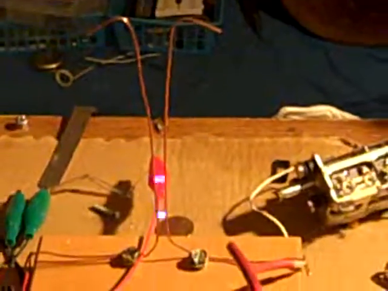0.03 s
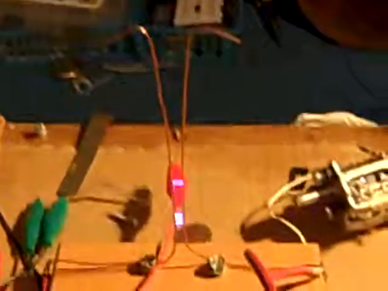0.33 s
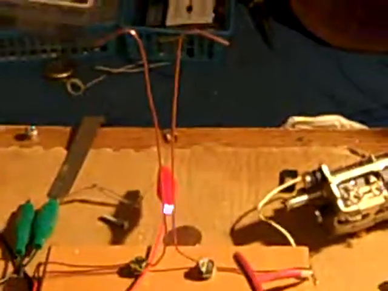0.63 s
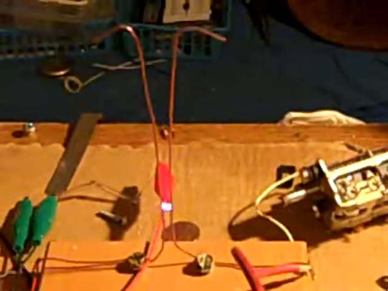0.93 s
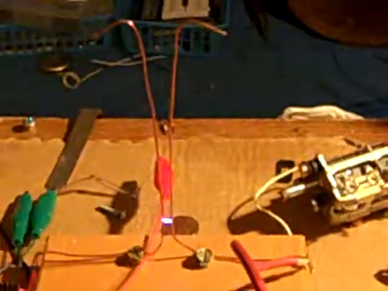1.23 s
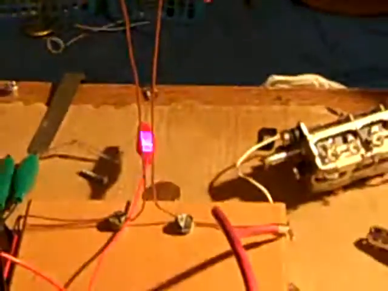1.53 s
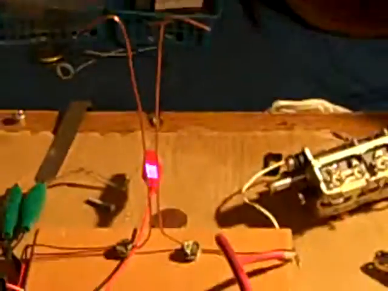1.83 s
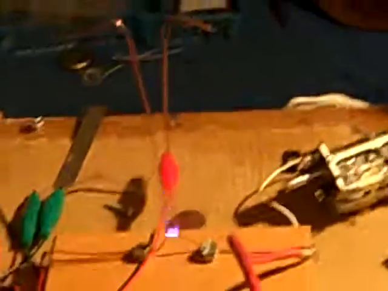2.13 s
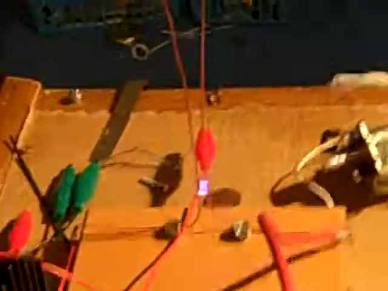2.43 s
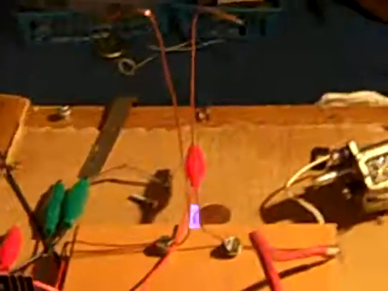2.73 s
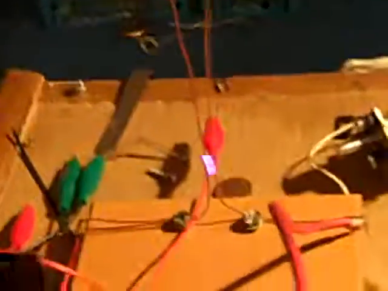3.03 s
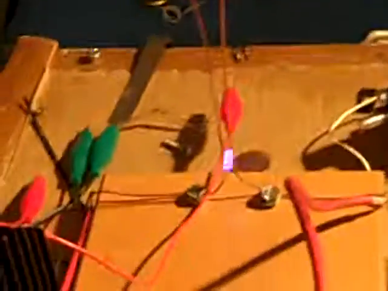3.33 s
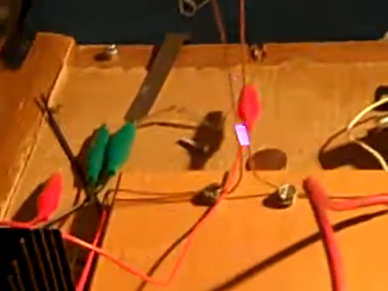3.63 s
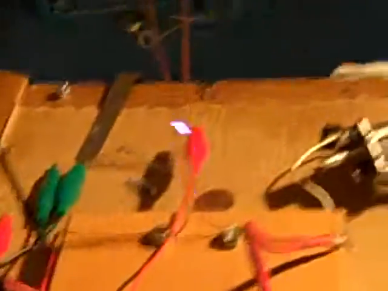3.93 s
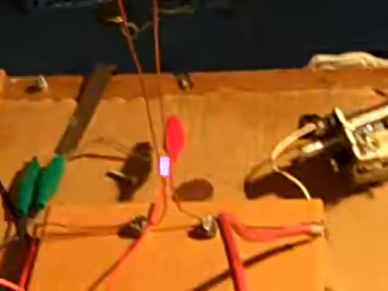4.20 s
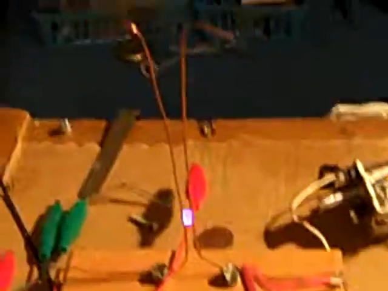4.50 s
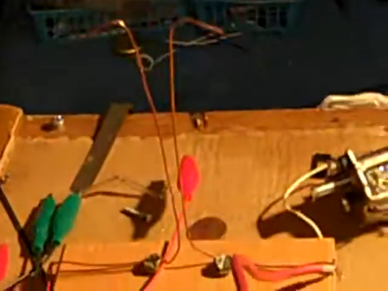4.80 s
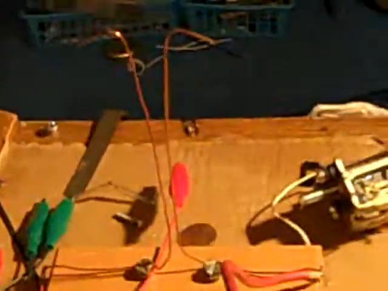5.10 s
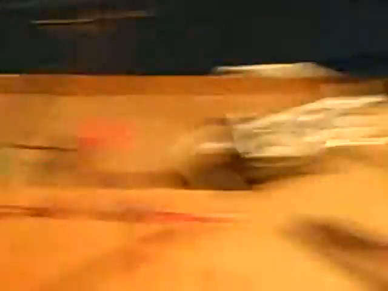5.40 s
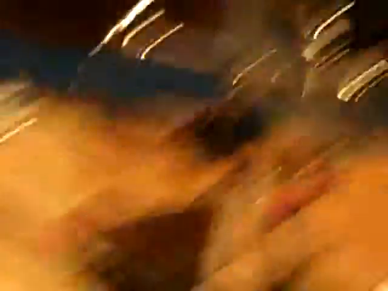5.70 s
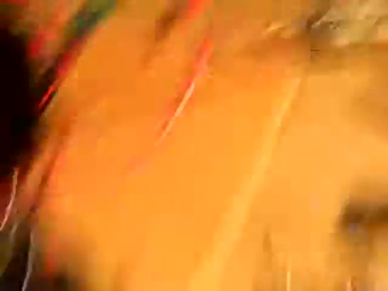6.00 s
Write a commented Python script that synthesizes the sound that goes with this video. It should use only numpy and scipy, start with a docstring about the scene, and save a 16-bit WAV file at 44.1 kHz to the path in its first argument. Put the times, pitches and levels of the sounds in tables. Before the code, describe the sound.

A small high-voltage arc between two wires sizzles with a thin, high buzz, chirping irregularly as it stretches, drops in pitch and snaps back. After about five seconds a switch clacks and the arc stops dead. Faint room air, low hum and a thin whine remain. Fingers tick and rub on the nearby hand-held microphone, and a button clicks at the end.

```python
"""A sizzling, chirping buzz: thousands of sparks a second cross a small high-voltage gap in a room.
The gap, two wires on a wooden board, is a relaxation oscillator: it charges until the air breaks down,
so a stretching arc sparks slower and louder, then restrikes short. A switch clacks and cuts the power,
a few last sparks drain the charge, and room air, hum and a thin whine remain, with finger noise and a
button click on the nearby hand-held camera whose two microphone ports hear the scene."""
import sys
import numpy as np
from scipy import signal
from scipy.fft import rfft, irfft
from scipy.io import wavfile
from scipy.ndimage import map_coordinates

SR = 44100
rng = np.random.default_rng(int(sys.argv[2]) if len(sys.argv) > 2 else 0)


def bounce(signal):
    """Save signal as a 16-bit WAV file at the path given by the first command-line argument."""
    frames = np.transpose(np.atleast_2d(signal))
    limited = np.clip(frames, -1, 1)
    pcm = np.round(limited * 32767).astype(np.int16)
    wavfile.write(sys.argv[1], SR, pcm)


N = 271215
TIME = np.arange(N) / SR

# reverberation time of the room [f/Hz, T60/s]
ROOM_DECAY = [(1000, 0.47), (2200, 0.28), (7000, 0.27), (14000, 0.22)]
# spectrum of the room air [f/Hz, level/dB]
AIR_SPECTRUM = [(25, -18), (70, -1.5), (210, 1), (330, -3.5), (750, -2), (1500, -10.5), (6500, -14.5),
                (11000, -28)]
# envelopes of the air, hum and whine [t/s, level/dB]
AIR_ENVELOPE = [(4.9, -61), (5.15, -52), (5.55, -49), (5.8, -47.5), (5.98, -49.5)]
HUM_ENVELOPE = [(0, -84), (2, -67), (4.95, -69.5), (5.13, -53), (5.4, -64), (5.62, -57), (5.8, -66)]
WHINE_ENVELOPE = [(4.9, -71), (5.15, -56.5), (5.65, -56.5), (5.85, -59.5)]
# partials of the whine [harmonic number, level/dB]
WHINE_HARMONICS = [(1, -4), (2, -11.5), (3, -26)]
# finger contacts on the camera body [t/s, level/dB, decay time/s]
TOUCHES = [(5.514, -31.5, 0.0021), (5.609, -39.5, 0.0067), (5.657, -44, 0.09), (5.737, -47.5, .025),
           (5.778, -39.5, 0.017), (5.81, -39, .012), (5.8698, -36, 0.0082), (6.085, -45, 0.11)]
# spectra of a finger contact and of the button [f/Hz, level/dB]
TOUCH_SPECTRUM = [(60, -25), (200, -10), (400, -3.5), (3500, -12.5), (6800, -5), (14000, -41)]
BUTTON_SPECTRUM = [(600, -13), (1700, -1), (5000, -9), (14000, -49)]
# modes of the switch and its housing [f/Hz, level/dB, T60/s]
HOUSING_MODES = [(781, -4.5, 0.025), (1000, -2, .015), (1369, 2.5, 0.0088), (2000, 3.5, 0.011),
                 (2750, -13, 0.0054)]
# the arc climbs the spreading wires, then snaps back to the bottom
# [start t/s, snap t/s, spark rate at the top f/Hz, level/dB, unsteadiness 0-1]
ARC_CLIMBS = [(0, .018, 4208, -0.5, 0.44), (0.178, .243, 4246, 2, .24), (.27, .428, 4800, -2, .2),
              (.441, 0.539, 4107, -0.7, 0.27), (.669, .714, 4457, -0.3, 0.31), (.744, 0.821, 7290, -3, .33),
              (1.015, 1.162, 6796, 0.5, 0.3), (1.162, 1.266, 5400, -1.2, 0.25),
              (1.584, 1.643, 4357, 2, 0.26), (1.692, 1.846, 3602, 2, .13), (1.869, 1.937, 4257, 0.5, .23),
              (2.148, 2.184, 2552, 1.7, 0.26), (2.968, 3.042, 4200, 3, 0.23), (3.126, 3.205, 4340, 2, 0.25),
              (3.224, 3.312, 4474, 1.1, 0.23), (3.34, 3.422, 4500, 3.5, 0.25), (3.552, 3.726, 3850, 2, .14),
              (3.744, 3.812, 4437, 0, 0.33), (3.826, 3.929, 3996, 2, 0.2), (3.937, 4.036, 4037, 2, .21),
              (4.036, 4.166, 3950, 2.1, 0.15), (4.178, 4.253, 4542, 3.8, .2), (4.397, 4.436, 4903, 4, 0.31),
              (4.473, 4.611, 3650, 4.5, .13), (4.612, 4.68, 5200, 2.2, 0.24), (4.693, 4.766, 4550, 3, 0.22),
              (4.781, 4.851, 4548, 2.3, 0.24), (4.851, 4.902, 5615, 0.5, 0.44)]
# the arc bows out and shrinks back unbroken [widest t/s, half duration/s, spark rate there f/Hz, level/dB]
ARC_SWELLS = [(.102, .03, 2800, -1.1), (.319, 0.041, 7610, 1.9), (.656, .016, 6604, -1.5),
              (0.852, 0.023, 6110, -1), (.945, .03, 2752, -0.7), (1.376, .01, 8605, -0.5),
              (1.511, 0.029, 3051, -1), (2.036, .07, 4899, 0.4), (2.275, .022, 9000, 2),
              (2.338, .029, 2900, 0), (2.447, .038, 6600, 1), (2.705, .037, 7897, 2),
              (2.788, .044, 6110, 1.3), (2.914, .03, 3098, -0.5), (3.491, .036, 2707, -0.4),
              (4.327, 0.037, 2673, 2.1)]
# overall envelope of the arc [t/s, level/dB]
ARC_ENVELOPE = [(0, 3), (1.2, 2.5), (1.42, 4.5), (1.7, 2), (2.25, 1.27), (3.1, 2.5), (4.3, -1), (4.9, 0.5)]
# the arc stalls for an instant, then catches and flares [t/s, extra level/dB]
ARC_FLARES = [(.281, 7), (.605, 5), (.641, 7), (.76, 3.5), (.837, 6.5), (1.054, 3), (1.258, 4), (2.25, 7.5),
              (2.441, 3.5), (2.6, 5), (2.69, 8), (2.865, 4), (3.757, -1), (3.834, 0), (4.41, 0),
              (4.708, 2.5)]
# single sparks as the supply drains [t/s, level/dB]
DRAIN_SPARKS = [(4.9054, 0), (4.906, 1), (4.909, 1), (4.911, -2), (4.9126, -6), (4.9214, -5)]
# response of each microphone port to a spark [f/Hz, left level/dB, right level/dB]
PORT_SPECTRA = [(720, -28, -16.5), (1370, -24.5, -17.5), (2210, -16, -16.5), (2740, -14.5, -15),
                (3320, -18, -16.5), (4720, -12, -12), (5290, -15, -10.5), (5920, -8.5, -3.5),
                (6640, -7.5, -10), (7380, -2, -10), (7600, -6, -19.5), (9060, -14, -21.5),
                (12230, -22, -40), (14200, -11.5, -26.5)]


def amp(db):
    return 10 ** (np.asarray(db) / 20)


def unit_rms(x):
    return x / np.sqrt(np.mean(x ** 2) + 1e-20)


def at_hz(points, hz):
    """Interpolation on a log-frequency axis."""
    f, value = np.transpose(points)
    return np.interp(np.log(hz + 1), np.log(f + 1), value)


def envelope(points):
    """Gain at every sample, interpolated in decibels."""
    return amp(np.interp(TIME, *np.transpose(points)))


def wander(hz):
    """Random fluctuation of rms 1, low-passed at hz."""
    f = np.fft.rfftfreq(N, 1 / SR)
    return unit_rms(irfft(rfft(rng.standard_normal(N)) / (1 + (f / hz) ** 4), N))


def noise_pair(correlation):
    """Partly coherent white noise at two ports."""
    a, b = rng.standard_normal((2, N))
    return np.array([a, correlation * a + np.sqrt(1 - correlation ** 2) * b])


def colour(x, spectrum, size=4096):
    """Minimum-phase filtering: it is causal, so clicks keep a sharp front."""
    log_gain = np.log(amp(at_hz(spectrum, abs(np.fft.fftfreq(size, 1 / SR)))))
    taps = np.fft.ifft(np.exp(np.conj(signal.hilbert(log_gain)))).real[:size // 2]
    return signal.oaconvolve(np.atleast_2d(x), taps[None], axes=1)[:, :N]


def room(x, near_db, near_s, tail_db):
    """Reflection: direct sound, early scatter from the bench, and a tail whose treble dies first."""
    t = TIME[:SR // 2]
    taps = rng.choice([-1., 1.], (2, 2, len(t))) * (rng.random((2, 2, len(t))) < 1 / 8)
    near = taps[0] * np.exp(-t / near_s) * (t > .0005)
    hz, frame_s, bands = signal.stft(taps[1] * (t > .005), SR, nperseg=256)
    bands *= amp(-60 * frame_s / at_hz(ROOM_DECAY, hz)[:, None])
    tail = signal.istft(bands, SR, nperseg=256)[1][:, :len(t)]
    echoes = sum(amp(db) * response / np.linalg.norm(response, axis=1, keepdims=True)
                 for db, response in [(near_db, near), (tail_db, tail)])
    return x + signal.oaconvolve(x * np.ones((2, 1)), echoes, axes=1)[:, :N]


def room_air():
    """Broadband ambient noise, strongest in the bass."""
    return envelope(AIR_ENVELOPE) * unit_rms(colour(noise_pair(.56), AIR_SPECTRUM))


def mains_hum(hz=97, waver=.0233):
    """A low tone under slight random frequency and amplitude modulation."""
    phase = 2 * np.pi * np.cumsum(hz * (1 + waver * wander(6.3))) / SR
    return np.sqrt(2) * envelope(HUM_ENVELOPE) * amp(.76 * wander(10)) * np.sin(phase)


def whine(hz=1247, waver=.00121):
    """A thin harmonic series on an almost steady fundamental."""
    phase = 2 * np.pi * np.cumsum(hz * (1 + waver * wander(4.7))) / SR
    partials = sum(amp(db) * np.sin(round(k) * phase) for k, db in WHINE_HARMONICS)
    return np.sqrt(2) * envelope(WHINE_ENVELOPE) * partials


def handling(grain_db=3):
    """Impact and friction: fingers tick and rub on the camera body in grainy bursts."""
    touch = sum(amp(db) * np.exp(-abs(TIME - s) / decay) * (TIME >= s) for s, db, decay in TOUCHES)
    friction = noise_pair(.15) * amp(grain_db * wander(700))
    return touch * unit_rms(colour(friction, TOUCH_SPECTRUM))


def button(s=6.1445, level_db=-21, decay_s=.0048):
    """A heavily damped impact: the camera's plastic button gives a broadband click."""
    push = np.exp(-abs(TIME - s) / decay_s) * (TIME >= s)
    return amp(level_db) * push * unit_rms(colour(noise_pair(.67), BUTTON_SPECTRUM))


def switch(s=4.8848, gain_db=-19, low_hz=680):
    """Damped modes: the power switch clacks, too small to radiate bass, and excites the room."""
    age = np.maximum(TIME - s, 0)
    knock = sum(amp(db - 60 * age / t60) * np.sin(2 * np.pi * hz * age) for hz, db, t60 in HOUSING_MODES)
    knock = signal.sosfilt(signal.butter(5, low_hz, "high", fs=SR, output="sos"), knock)
    return amp(gain_db) * room(knock, near_db=0, near_s=.008, tail_db=-8)


def spark_pulses(times, strength, length, width_s=.85e-5, oversample=4):
    """Sudden heating gives one Gaussian pressure pulse a spark, wider for a longer gap."""
    centre = times[:, None] * SR * oversample
    width = width_s * SR * oversample * np.clip(length, .5, 2)[:, None]
    places = np.round(centre).astype(int) + np.arange(-4 * oversample, 4 * oversample + 1)
    bells = np.exp(-.5 * ((places - centre) / width) ** 2)
    bells *= (oversample * strength / bells.sum(1))[:, None]
    fine = np.bincount(np.clip(places, 0, N * oversample - 1).ravel(), bells.ravel(), N * oversample)
    return signal.resample_poly(fine, 1, oversample)


def last_sparks(gain_db=8):
    """With the power off, stored charge drains in a few scattered breakdowns."""
    times, db = np.transpose(DRAIN_SPARKS)
    return spark_pulses(times, amp(db + gain_db), np.ones(len(times)))


def arc_channel(t, short_hz=11690, short_unsteady=.27, swell_unsteady=.255, climb_s=.088, settle=.498,
                lift_off_db=1.4, snap_db=2, snap_s=.0033, thin_db=4.5, deep_hz=2850):
    """Breakdown voltage grows with length: stretching sets the spark rate, level and unsteadiness."""
    wait = np.full(len(t), 1 / short_hz)
    level_db = np.interp(t, *np.transpose(ARC_ENVELOPE))
    unsteady = np.full(len(t), short_unsteady)
    for start, snap, hz, db, top_unsteady in ARC_CLIMBS:
        now = (t > start) & (t < snap)
        stretch = np.expm1((start - t[now]) / climb_s) / np.expm1((start - snap) / climb_s)
        settled = stretch ** settle
        wait[now] += stretch * (1 / hz - 1 / short_hz)
        dip_db = lift_off_db * np.sin(np.pi * settled) ** 2  # weaker on leaving the bottom
        crack_db = snap_db * np.exp((t[now] - snap) / snap_s)  # louder just before breaking
        level_db[now] += settled * db - dip_db + crack_db
        unsteady[now] += settled * (top_unsteady - short_unsteady)
    for s, half_s, hz, db in ARC_SWELLS:
        now = abs(t - s) < 4 * half_s
        stretch = np.exp(-abs((t[now] - s) / half_s) ** 1.9)
        settled = stretch ** settle
        wait[now] += stretch * (1 / hz - 1 / short_hz)
        dip_db = thin_db * (deep_hz / hz) ** 2 * np.sin(np.pi * settled)  # a deep swell has weak flanks
        level_db[now] += settled * db - dip_db
        unsteady[now] += settled * (swell_unsteady - short_unsteady)
    return 1 / wait, level_db, unsteady


def arc(end_s=4.903, usual_hz=6000, jitter=.499, flutter=.24, quiver=.56, sputter_db=7,
        stall_db=4, stall_s=.008, flare_s=.015, stray_db=4, stray_share=.0027, restrike=.37):
    """Relaxation oscillation: the supply recharges to breakdown; a longer gap fires later and harder."""
    t = TIME[TIME < end_s]
    rate, arc_db, unsteady = arc_channel(t)
    # the channel quivers, and its feet skip on the wires, which matters most when it is short
    skip = flutter * np.sqrt(rate / usual_hz) * wander(150)[:len(t)]
    gap = usual_hz / rate * np.exp(unsteady * (skip + quiver * wander(1700)[:len(t)]))
    gap *= np.exp(.072 * wander(600)[:len(t)])  # even a steady channel wobbles in its own hot air
    # a spark fires at each full charge, a little early or late
    charge = np.cumsum(usual_hz / gap) / SR
    cycles = np.arange(int(charge[-1]))
    scatter = jitter * np.interp(cycles, charge, unsteady)
    thresholds = np.cumsum(np.exp(scatter * rng.standard_normal(N)[:len(cycles)] - scatter ** 2 / 2))
    times = np.interp(thresholds[thresholds < charge[-1]], charge, t)
    length = np.interp(times, t, gap)  # relative to the gap that fires at usual_hz
    level_db = np.interp(times, t, arc_db + sputter_db * unsteady * wander(300)[:len(t)])
    for s, db in ARC_FLARES:
        apart = abs(times - s)
        level_db += np.where(times < s, -stall_db * np.exp(-apart / stall_s), db * np.exp(-apart / flare_s))
    luck, ring_back = rng.random((2, N))[:, :len(times)]
    level_db += stray_db * (luck < stray_share)  # the odd spark snaps harder
    strength = amp(level_db) * length ** 1.16
    strength *= np.interp(times, t, rate / usual_hz) ** .17  # crowded sparks gain a little
    lateness = np.diff(times, prepend=0) * usual_hz / length
    strength *= np.clip(lateness, .5, 2) ** .85  # a late spark has stored more charge
    # across a long gap the circuit rings back and strikes again halfway to the next spark
    again = restrike * (1 - .69 * ring_back) * np.clip(2 * (length - 1), 0, 1)
    halfway = times + np.diff(times, append=end_s) / 2
    return spark_pulses(times, strength, length) + spark_pulses(halfway, again * strength, length)


def spark_gap(low_hz=560, lag_s=2.4e-5, sway_s=.8e-5, hop_s=1.1e-5):
    """Path difference: the sparks reach two ports with a lag that varies as the camera sways."""
    highpass = signal.butter(2, low_hz, "high", fs=SR, output="sos")  # a steady push does not radiate
    pulses = signal.sosfilt(highpass, arc() + last_sparks())
    left, right = (colour(pulses, np.array(PORT_SPECTRA)[:, [0, side]])[0] for side in (1, 2))
    lag = lag_s + sway_s * wander(1) + hop_s * wander(133)  # the sparks also hop about on the wires
    right = map_coordinates(right, [(TIME + lag) * SR], order=5)
    return room(np.array([left, right]), near_db=-9, near_s=.0021, tail_db=-13)


def scene():
    """Superposition of all sources, with the background 3 dB stronger on the right."""
    foreground = spark_gap() + switch() + handling() + button()
    background = room_air() + mains_hum() + whine()
    return foreground + background * amp([[-1.5], [1.5]])


def record(dry, edge_hz=14230):
    """Band limiting by a steep linear-phase low-pass filter."""
    lowpass = signal.firwin(1023, edge_hz, window=("kaiser", 9), fs=SR)
    return signal.oaconvolve(dry, lowpass[None], "same")


dry = scene()
out = record(dry)
bounce(out)
```